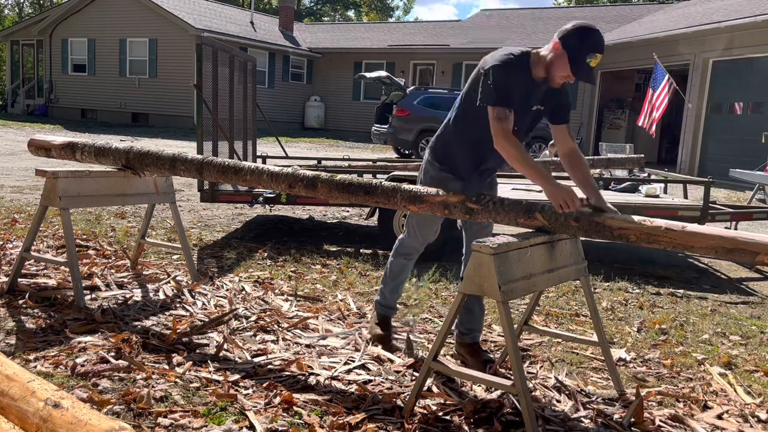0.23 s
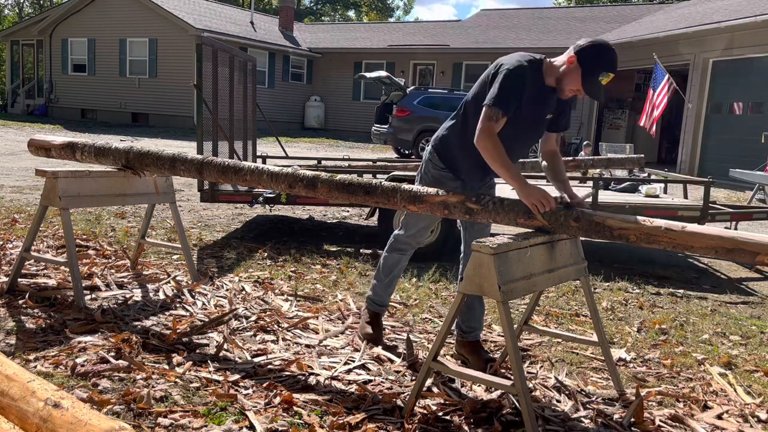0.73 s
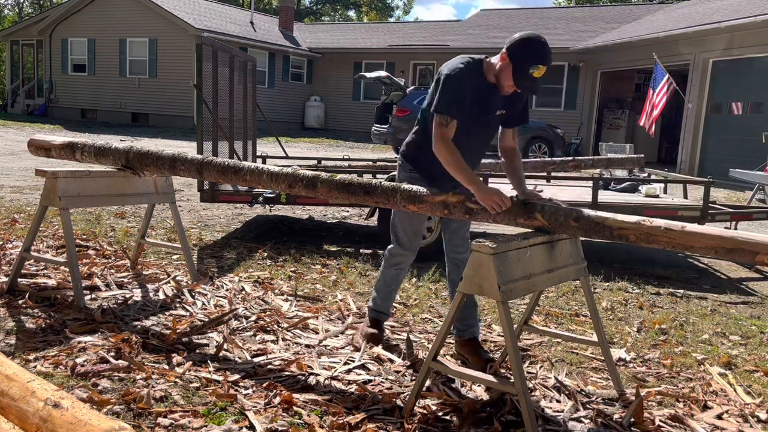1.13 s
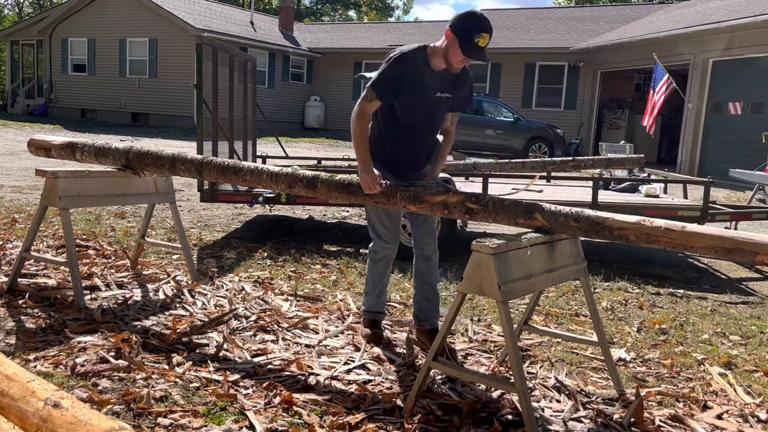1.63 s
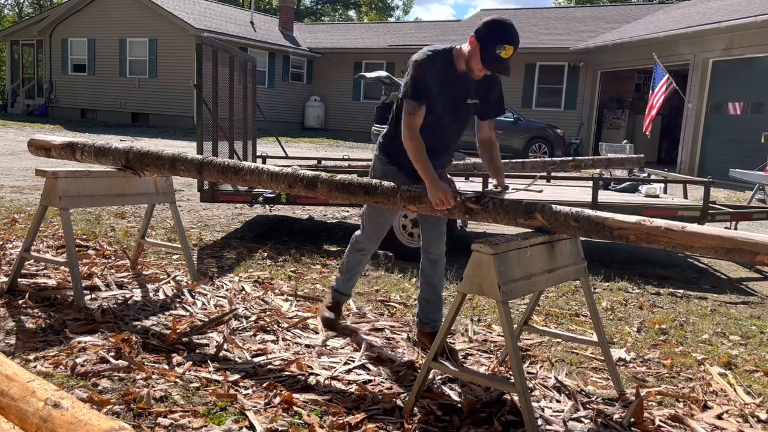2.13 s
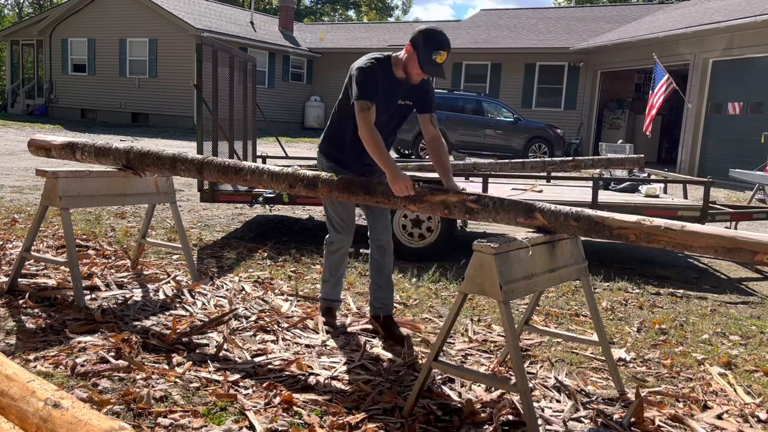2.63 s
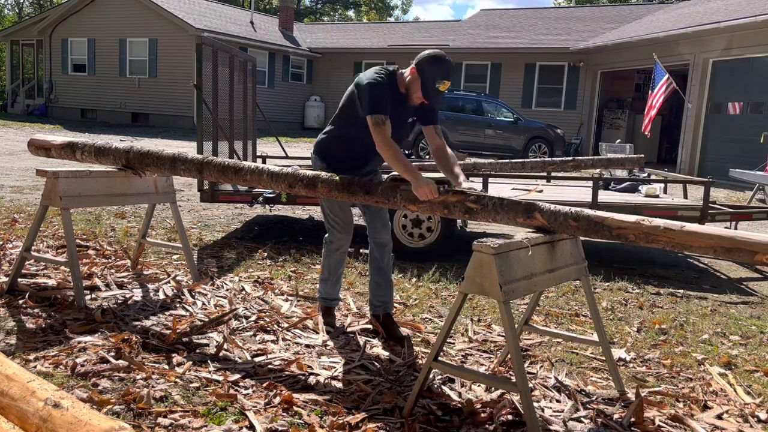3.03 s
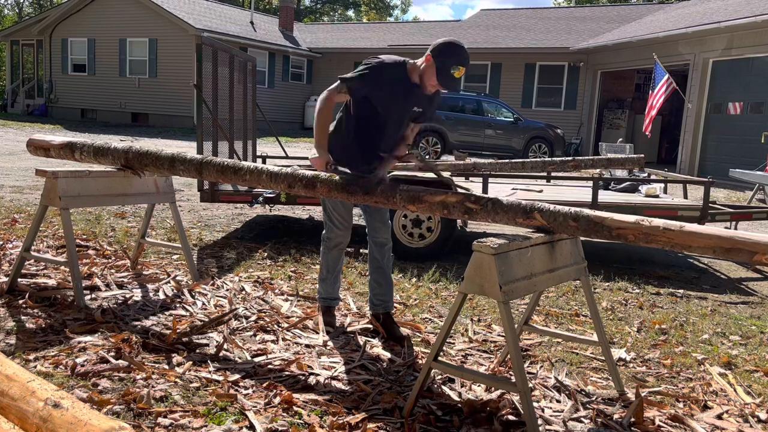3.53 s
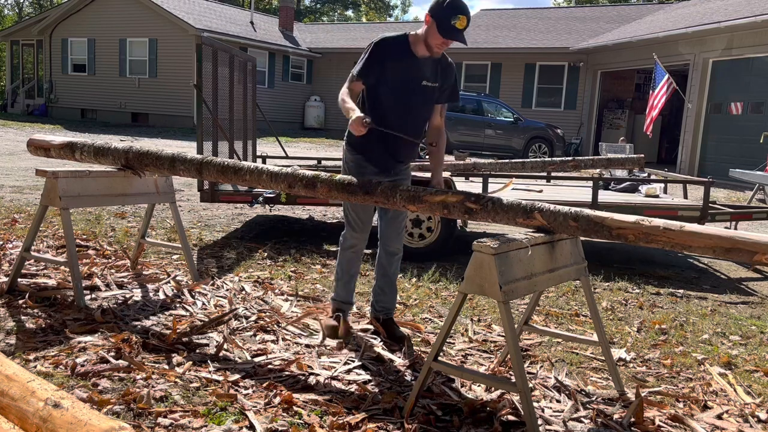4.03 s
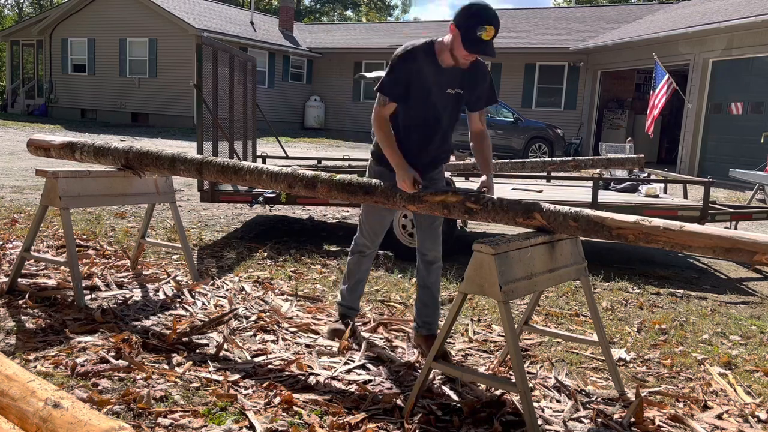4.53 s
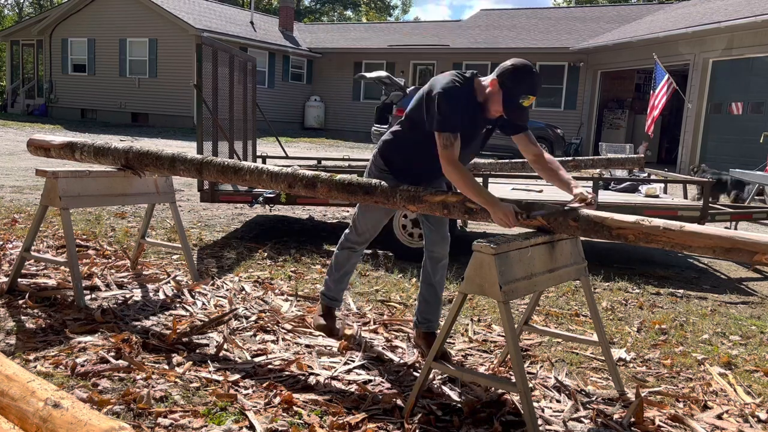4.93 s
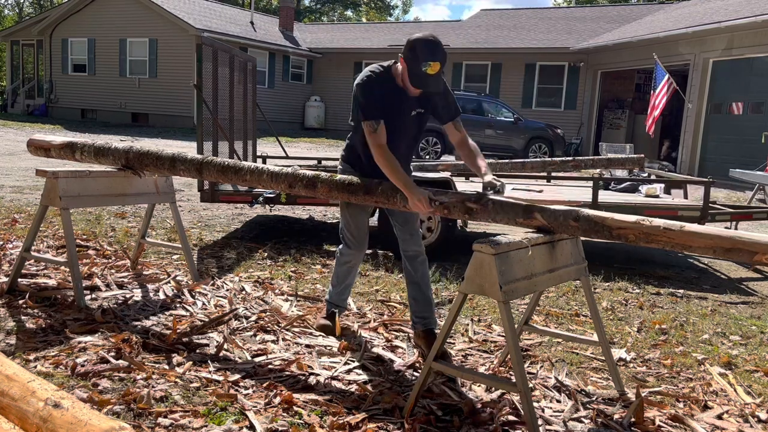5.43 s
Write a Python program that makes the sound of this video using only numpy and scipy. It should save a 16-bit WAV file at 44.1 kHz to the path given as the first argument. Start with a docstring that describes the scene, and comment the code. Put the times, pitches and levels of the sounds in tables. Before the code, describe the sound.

Steel scrapes and cracks into a log in uneven strokes, tearing off dry bark, with faint distant traffic behind.

```python
"""In a yard, a drawknife is pulled along a thin log on sawhorses, over dry rustling shavings.
The blade bites into knots: each bite cracks in the steel and rings the log's bending modes.
Bark tears off in crowds of snapping fibres; laid flat, the blade rasps, and it chinks as it grazes.
Far traffic rumble, air hiss and a faint steady hum lie under it."""
import sys
import numpy as np
from scipy import signal
from scipy.fft import rfft, irfft, next_fast_len
from scipy.io import wavfile

SR = 44100
rng = np.random.default_rng(int(sys.argv[2]) if len(sys.argv) > 2 else 0)


def wav_record(signal):
    """Record a signal, one row per channel, as 16-bit PCM in the file named by sys.argv[1]."""
    frames = np.transpose(np.atleast_2d(signal))
    bounded = np.clip(frames, -1, 1)
    # unit amplitude maps onto the largest positive 16-bit level
    quanta = np.round(bounded * 32767).astype(np.int16)
    wavfile.write(sys.argv[1], SR, quanta)


N = 250488


def from_db(db):
    """Gain of a level in dB."""
    return 10 ** (np.asarray(db) / 20)


def rms_one(x):
    """Scaled to rms 1."""
    return x / np.sqrt(np.mean(x ** 2) + 1e-20)


def at_hz(points, hz):
    """A curve of (f/Hz, value) read on a log-frequency axis."""
    return np.interp(np.log(hz), np.log(np.array(points)[:, 0]), np.array(points)[:, 1])


def nearness(hz, centre_hz, octaves):
    """Weight that falls off with the pitch distance from a centre."""
    return 1 / (1 + (np.log2(hz / centre_hz) / octaves) ** 2)


def butter(x, order, hz, kind="low"):
    """Butterworth filter."""
    return signal.sosfilt(signal.butter(order, hz, kind, fs=SR, output="sos"), x)


def drift(hz):
    """Smooth random modulation of rms 1."""
    r = np.exp(-80 * np.pi * hz / SR)
    slow = signal.lfilter([1], [1, -2 * r, r * r], rng.standard_normal(N // 40 + 2002))[2000:]
    return np.interp(np.arange(N) / 40, np.arange(len(slow)), rms_one(slow))


def grit(size, per_s, spread_db):
    """Random clicks of uneven size; rms 1."""
    sizes = from_db(spread_db * np.minimum(rng.exponential(1, size), 4)) * rng.standard_normal(size)
    return rms_one(sizes * (rng.random(size) < per_s / SR))


def resonate(x, peaks):
    """Parallel resonances of (f/Hz, width/Hz, level/dB) with alternating signs."""
    out = 0
    for k, (hz, width, db) in enumerate(peaks):
        r = np.exp(-np.pi * width / SR)
        zeros = (1 - r * r) / 2 * np.array([1, 0, -1])
        poles = [1, -2 * r * np.cos(2 * np.pi * hz / SR), r * r]
        out = out + (-1) ** k * from_db(db) * signal.lfilter(zeros, poles, x)
    return out


def friction_rings(forces, rings):
    """Each ring filters its own friction track twice, so the valleys stay deep."""
    return sum(resonate(resonate(force, [(hz, 2 * width, 0)]), [(hz, width, db)])
               for (hz, width, db), force in zip(rings, forces))


def add(track, s, sound):
    """Mix a sound into the track at s seconds."""
    at = int(round(s * SR))
    track[..., at:at + sound.shape[-1]] += sound[..., :N - at]


# Tone of the traffic and air bed: f/Hz, relative density/dB
BED_SPECTRUM = [(15, -90), (25, -92), (102, -7.5), (236, -6.5), (263, -39), (301, -10.5), (326, -3),
                (427, -12), (560, -18), (1070, -13.5), (1230, -17.5), (2050, -13), (10100, -24),
                (14000, -32), (16000, -71)]
# Its stereo image: f/Hz, left-right correlation
BED_CORRELATION = [(30, 0.8), (80, 0.98), (300, 0.94), (700, 0.67), (1300, -0.089), (2400, -0.36),
                   (4400, 0.68), (8000, 0.14), (14000, 0.19)]


def traffic_and_air(level_db=-51.5, flicker_db=0.95):
    """Far rumble and hiss: half-octave bands of stereo noise, each flickering on its own."""
    bed, edges = 0, 22 * 2 ** np.arange(0, 10, .5)
    white = rng.standard_normal((2, 2, N))
    for k, (low, high) in enumerate(zip(edges, edges[1:])):
        mid, side = butter(white[k % 2], 2, [low, high], "band")
        hz = np.sqrt(low * high)
        alike = at_hz(BED_CORRELATION, hz)
        gain = from_db(at_hz(BED_SPECTRUM, hz) + flicker_db * drift(21))
        bed = bed + gain * (np.sqrt(1 + alike) * mid + np.sqrt(1 - alike) * side * [[1], [-1]])
    bed = signal.sosfilt(signal.cheby2(10, 45, 15000, fs=SR, output="sos"), bed)   # distance dulls it
    return from_db(level_db) * rms_one(bed)


def hum(hz=296.9, level_db=-58):
    """A faint sine that wavers a little in pitch and level."""
    phase = 2 * np.pi * np.cumsum(hz + 0.814 * drift(1.28)) / SR
    return np.sqrt(2) * from_db(level_db + 0.076 * drift(1.8)) * np.sin(phase)


def shavings(ticks_per_s=150, level_db=-70):
    """Dry shavings underfoot tick in sparse, faint clumps."""
    ticks = grit(N, per_s=ticks_per_s * from_db(4.4 * drift(6.4)), spread_db=-2)
    smeared = signal.lfilter([1], [1, -.992], np.abs(ticks)) * rng.standard_normal(N)
    return from_db(level_db) * rms_one(resonate(smeared, [(1200, 2700, 8.7), (4360, 13000, 1.9)]))


# Bites and taps, levels relative within a column: t/s, crack/dB, edge over crack/dB,
# bright ring/dB, its f/Hz, thud/dB, its f/Hz, long woody ring/dB, its f/Hz
BITE_CUES = [(0.131, -28, -3, -46, 1410, -60, 327, -70, 480),
             (0.143, -34, -4, -53, 980, -55.5, 304, -71, 480),
             (0.4392, -54, -16, -35.5, 960, -37, 360, -50, 486),
             (0.6116, -38, -16, -30.5, 930, -43.5, 347, -64, 477),
             (0.6235, -30, -12, -46, 1490, -52, 340, -62, 480),
             (0.641, -50, -12, -46.5, 910, -45.5, 382, -55, 480),
             (1.1777, -37, -10, -77, 886, -83, 291, -79, 480),
             (1.537, -50, -12, -51.5, 1080, -67, 300, -65, 600),
             (2.3665, -20.5, -0.5, -28.5, 1330, -44.5, 294, -39, 556),
             (2.3684, -5.5, -14, -26.5, 1330, -32.5, 287, -32, 580),
             (2.523, -34.5, 2, -45, 1210, -60, 297, -56, 480),
             (2.589, -29.5, -18, -45, 1560, -58, 246, -60, 483),
             (2.798, -15, -3.5, -20.5, 1240, -43, 305, -56, 480),
             (2.806, -24, -3, -30, 1160, -45, 265, -36, 503),
             (2.899, -18, -21, -58, 1280, -44, 294, -60, 480),
             (2.9039, -19, -16, -44, 1330, -43, 350, -51, 480),
             (3.1394, -5, -7.5, -21.5, 1300, -49, 300, -49, 633),
             (3.142, -3.5, -11, -16, 1240, -35.5, 306, -30.5, 595),
             (3.255, -34, -14, -56, 1500, -71, 250, -61, 480),
             (3.2707, -32, -5, -49, 1000, -38, 205, -56, 480),
             (3.353, -33, -6, -61, 1290, -45.5, 242, -41, 480),
             (3.4692, -4, -22, -19.5, 1405, -38.5, 251, -32, 670),
             (3.6039, -36, -2, -55.5, 960, -51, 179, -46.5, 640),
             (4.542, -53, -10, -44.5, 930, -59, 380, -43, 563),
             (5.2048, -25, 0, -36, 1390, -64, 305, -59, 480),
             (5.5118, -22, 4, -35, 1680, -64, 350, -60, 480),
             (5.5134, -17, -2.5, -31.5, 1000, -52.5, 384, -50, 474),
             (5.561, -42, -12, -69, 1500, -70, 293, -76, 470),
             (5.582, -38, -12, -70, 1500, -66, 300, -74, 480),
             (5.6165, -45, -12, -51, 1970, -53, 300, -78, 480),
             (5.639, -25.5, -14, -34, 2120, -48, 320, -67, 600)]
# Resonances of the steel blade and of its thin cutting edge: f/Hz, width/Hz, level/dB
STEEL_RINGS = [(4140, 420, 9), (5160, 950, 1), (5900, 380, 0.5), (2520, 7300, -7.5), (11650, 2040, -8)]
EDGE_RINGS = [(8170, 4400, 3), (14600, 4300, -1)]


def bites(crack_rise_s=0.0006, swing_rise_s=0.0014, knock_t60_s=0.055):
    """The blade cracks into a knot and knocks the wood; returns sound and forces on the log."""
    crack, edge, dull = np.zeros((3, N))
    forces = np.zeros((len(LOG_MODES), N))
    t = np.arange(SR // 10) / SR
    for s, crack_db, edge_db, ring_db, ring_hz, thud_db, thud_hz, woody_db, woody_hz in BITE_CUES:
        burst = t / crack_rise_s * np.exp(1 - t / crack_rise_s) * grit(len(t), per_s=7600, spread_db=-4)
        burst[int(crack_rise_s * SR)] += 6   # the fibre gives way with one sharp snap
        burst = 8.96 * burst / np.linalg.norm(burst)
        add(crack, s, from_db(crack_db) * burst)
        add(edge, s, from_db(crack_db + edge_db) * burst)
        zone_db = [thud_db + 14, woody_db + 21, ring_db + 8]
        add(forces, s, blow_on_log(s, t, zone_db, [thud_hz, woody_hz, ring_hz]))
        envelope = from_db(ring_db + 12.5 - 60 * t / knock_t60_s) * np.minimum(t / 0.0082, 1)
        knock = envelope * rng.standard_normal(len(t))
        add(dull, s, resonate(knock, [(ring_hz, 900, 0), (thud_hz, 350, -5), (2400, 1200, -6)]))
        # the struck spot swings at once, before the log fills
        swing = t / swing_rise_s * np.exp(-t / swing_rise_s) * np.sin(2 * np.pi * ring_hz * t)
        add(dull, s, from_db(ring_db + 8) * swing)
    return resonate(crack, STEEL_RINGS) + resonate(edge, EDGE_RINGS) + dull, forces


# Where the blade strikes: t/s, share of the log's length from its nearer end
STRIKE_PLACES = [(0.13, 0.315), (0.44, 0.48), (0.62, 0.32), (2.37, 0.37), (2.8, 0.485), (2.9, 0.425),
                 (3.14, 0.13), (3.27, 0.13), (3.35, 0.49), (3.47, 0.302), (4.54, 0.27), (5.2, 0.16),
                 (5.51, 0.087), (5.64, 0.45)]


def blow_on_log(s, t, zone_db, zone_hz, mode_step_hz=195, node_leak=0.47, woody_delay_s=0.00818):
    """A push that each mode takes up by its shape at the struck place."""
    hz = np.array(LOG_MODES)[:, :1]
    order = np.arange(len(hz))[:, None] + 1
    zone = np.digitize(hz, [420, 700])   # thud, long woody ring, bright ring
    fill_s = np.choose(zone, [0.0043, 0.013, 0.0065])   # time to fill log and sawhorse
    travel_s = 0.00171 * np.sqrt(1000 / hz)   # bending waves travel slower at low pitch
    age = t - travel_s - woody_delay_s * (zone == 1)
    push = np.sin(np.pi * np.clip(age / fill_s, 0, 1)) / (fill_s * SR)
    colour = nearness(hz, np.choose(zone, zone_hz), octaves=np.choose(zone, [0.22, 0.15, 0.43]))
    place = np.interp(s, *np.transpose(STRIKE_PLACES))
    shape = 1.29 * (node_leak + np.abs(np.sin(np.pi * np.round(hz / mode_step_hz) * place)))
    gain = from_db(np.choose(zone, zone_db) + 4.4 * rng.standard_normal(hz.shape))
    swing = (-1) ** order * np.sin(2 * np.pi * hz * age)
    return gain * colour * shape * swing * push


# Bending modes of the log: f/Hz, level/dB, t60/s
LOG_MODES = [(142, -18, 0.36), (188, -7, 0.22), (259.5, -2.5, 0.17), (321, -2, 0.045), (378.7, -5.5, 0.22),
             (475.6, -14.5, 0.22), (629, -14.5, 0.094), (639, -14.5, 0.28), (823.5, -1.5, 0.1),
             (1010, -1, 0.067), (1190, -2.5, 0.057), (1400, -6, 0.071), (1578, -1.5, 0.076),
             (1810, 0, 0.065), (1988, 0.5, 0.052), (2208, 3.5, 0.025), (2460, -3, 0.04),
             (2594, -3.5, 0.062), (2900, -35, 0.055)]


def log_body(forces):
    """Every mode of the log rings from its own force track."""
    out = np.zeros(N)
    for (hz, db, t60), force in zip(LOG_MODES, forces):
        r, w = from_db(-60 / (t60 * SR)), 2 * np.pi * hz / SR
        out += from_db(db) * signal.lfilter([0, np.sin(w)], [1, -2 * r * np.cos(w), r * r], force + 1e-18)
    return out


# Bark rips and shavings crunch: peak t/s, relative level/dB, wood share/dB, swell/s, t60/s, centre f/Hz
TEAR_CUES = [(0.17, -59.5, 7.5, 0.02, 0.49, 3000), (0.368, -39, -44, 0.0054, 0.18, 2700),
             (0.402, -49, -3, 0.019, 0.42, 5600), (0.491, -45.5, -2, 0.01, 0.074, 3550),
             (0.614, -34.5, 4, 0.0051, 0.14, 3120), (0.681, -49, -1.5, 0.0097, 0.1, 3000),
             (1.56, -54, -4, 0.02, 0.5, 4000), (1.63, -51.5, 0.5, 0.0097, 0.11, 2980),
             (1.652, -50, -13, 0.007, 0.083, 2970), (2.373, -32, 3, 0.0024, 0.14, 4800),
             (2.421, -41.5, 1, 0.01, 0.24, 3880), (2.48, -41.5, -10, 0.0093, 0.16, 5950),
             (2.5, -33.5, -13.5, 0.01, 0.18, 3700), (2.519, -39, -0.5, 0.01, 0.15, 5930),
             (2.581, -38.5, -2, 0.016, 0.24, 4500), (2.807, -33.5, 4, 0.008, 0.2, 4130),
             (2.902, -26, -15.5, 0.016, 0.12, 4060), (2.93, -45.5, 3, 0.0057, 0.46, 5170),
             (2.981, -39.5, -3.5, 0.0064, 0.19, 3950), (3.149, -35, 4.5, 0.0061, 0.25, 4420),
             (3.262, -32, -5.5, 0.023, 0.24, 4260), (3.292, -41, -5, 0.01, 0.24, 5630),
             (3.352, -31.5, -1, 0.013, 0.21, 3780), (3.476, -35.5, 3.5, 0.0062, 0.26, 5000),
             (3.544, -52.5, 11, 0.015, 0.1, 3950), (3.799, -43, -13, 0.013, 0.17, 3500),
             (4.068, -49.5, -19, 0.014, 0.15, 6000), (4.378, -49.5, -6, 0.014, 0.16, 5540),
             (5.204, -28, -19, 0.0022, 0.049, 6440), (5.251, -46, -6, 0.0075, 0.073, 5050),
             (5.513, -30, -16, 0.011, 0.14, 6950), (5.553, -42, -7.5, 0.0067, 0.26, 3380),
             (5.62, -33.5, -19, 0.015, 0.39, 3650), (5.641, -40, 0, 0.0081, 0.13, 3950)]
# The blade skates under the bark before a hard bite: t/s, relative level/dB, length/s, swell/length
SKATE_CUES = [(2.312, -36.5, 0.057, 0.99), (2.761, -40, 0.046, 0.41), (3.098, -38, 0.062, 0.2),
              (3.432, -37.5, 0.04, 0.41)]
# Short rings of strips and blade, and the dull wood under the bark: f/Hz, width/Hz, level/dB
TEAR_RINGS = [(1990, 1000, 0), (3017, 160, 1), (3880, 970, 1.5), (4440, 470, -4.5), (5250, 150, -3),
              (6190, 150, -2.5), (8000, 3300, -8.5)]
WOOD_RINGS = [(333, 156, 1.5), (1200, 2630, 4), (2080, 1780, 5)]


def bark_tears(skate_wood_db=-10, skate_t60_s=0.028, skate_hz=6800):
    """Coarse and fine fibres snap in swelling, dying crowds; returns sound and force on the log."""
    forces, fine, wood = np.zeros((len(TEAR_RINGS), N)), np.zeros(N), np.zeros(N)
    t, hz = np.arange(SR // 3) / SR, np.array(TEAR_RINGS)[:, :1]
    clumps = rms_one(from_db(1.8 * drift(120)))   # fibres give way in bunches
    crowds = [(s - swell, db, wood_db, swell, 0, t60, centre_hz)
              for s, db, wood_db, swell, t60, centre_hz in TEAR_CUES]
    crowds += [(s, db, skate_wood_db, swell * length, length, skate_t60_s, skate_hz)
               for s, db, length, swell in SKATE_CUES]
    for s, db, wood_db, swell, hold, t60, centre_hz in crowds:
        at = rng.integers(N - len(t))
        attack = np.minimum(t / swell, 1) ** 1.2
        decay = from_db(-60 * np.maximum(t - max(swell, hold), 0) / t60)
        envelope = from_db(db) * attack * decay * clumps[at:at + len(t)]
        snaps = envelope * grit(len(t), per_s=6900, spread_db=-0.5)
        ring_gains = from_db(11 + 1.2 * rng.standard_normal(hz.shape))
        add(forces, s, ring_gains * nearness(hz, centre_hz, 0.86) * snaps)
        fine_db = -14.5 + 10.5 * np.log2(centre_hz / 4100)   # brighter tears hold more fine fibres
        add(fine, s, from_db(fine_db) * envelope * grit(len(t), per_s=21000, spread_db=-1))
        add(wood, s, from_db(wood_db) * envelope * grit(len(t), per_s=6800, spread_db=0))
    fizz = resonate(resonate(fine, [(10500, 21000, 1.1)]), [(8650, 3500, 2), (13500, 2100, 3.7)])
    crunch = from_db(12) * resonate(wood, WOOD_RINGS)
    return friction_rings(forces, TEAR_RINGS) + fizz + crunch, from_db(-33.5) * wood


# Flat strokes: t/s, length/s, level/dB, change over the stroke/dB, treble share/dB,
# relative rasp in the log/dB, rasp start f/Hz, rasp end f/Hz, grit centre f/Hz
SLIDE_CUES = [(0.801, 0.077, -54.5, 2, -1, -48, 825, 800, 4040),
              (1.095, 0.057, -50.5, -6, -4, -52.5, 1160, 1210, 4000),
              (1.17, 0.088, -51.5, -1.5, -3, -56, 1500, 1300, 4300),
              (1.263, 0.13, -56.5, 6, -1, -54, 1400, 1030, 4300),
              (1.393, 0.14, -52.5, -1.5, 4.5, -49, 1050, 1200, 4600),
              (4.54, 0.16, -59, -6, -12, -53.5, 745, 1120, 3000),
              (4.899, 0.13, -46, -4, -11, -49.5, 2190, 1600, 4800),
              (5.018, 0.2, -53.5, -1.5, -2.5, -51, 900, 1100, 4000)]
# Rings of the blade lying flat: f/Hz, width/Hz, level/dB
FLAT_BLADE_RINGS = [(1870, 540, 0), (2870, 140, 3.5), (3880, 780, 1.5), (4460, 230, 4.5), (5800, 430, 0),
                    (8350, 490, -10), (10000, 1300, -14), (12600, 1900, -11)]


def blade_slides(attack_s=0.013, release_s=0.011, ring_hz=3900, tilt_octaves=0.038, tilt_db_per_s=5):
    """Friction grit rings the blade and rasps in the wood; returns sound and forces on the log."""
    blade_hz, log_hz = np.array(FLAT_BLADE_RINGS)[:, :1], np.array(LOG_MODES)[:, :1]
    flicker = from_db([3 * drift(20) for _ in FLAT_BLADE_RINGS])
    friction = flicker * grit(N, per_s=3000, spread_db=-4)
    friction /= np.std(friction_rings(friction, FLAT_BLADE_RINGS))
    fine = grit(N, per_s=9100, spread_db=3)
    hiss = rms_one(resonate(fine, [(7950, 51000, 0.43), (11850, 13000, 1.9)]))
    flutter = from_db(1) * rms_one(butter(grit(N, per_s=2200, spread_db=-5), 2, 180))
    rub = grit(N, per_s=4400, spread_db=-9)
    out, pressure, forces = np.zeros(N), np.zeros(flicker.shape), np.zeros((len(LOG_MODES), N))
    for s, length, db, change_db, treble_db, rasp_db, start_hz, end_hz, centre_hz in SLIDE_CUES:
        at = np.arange(round(s * SR), round((s + length + release_s) * SR))
        t = at / SR - s
        progress = t / length
        touch = from_db(-7.5 * (np.maximum(1 - t / attack_s, 0) + np.maximum(t - length, 0) / release_s))
        level = touch * from_db(db + change_db * progress)
        # the blade tips up along the stroke: its ring rises and the hiss brightens
        pitch_hz = ring_hz * 2 ** (tilt_octaves * progress ** 2)
        ring = flutter[at] * np.sin(2 * np.pi * np.cumsum(pitch_hz) / SR)
        bright = from_db(treble_db + tilt_db_per_s * t)
        out[at] += level * (ring + bright * touch * hiss[at])
        pressure[:, at] += level * nearness(blade_hz, centre_hz, 2.5)
        rasp_hz = start_hz * (end_hz / start_hz) ** progress
        forces[:, at] += touch * from_db(rasp_db - 29) * nearness(log_hz, rasp_hz, 0.63) * rub[at]
    return out + friction_rings(pressure * friction, FLAT_BLADE_RINGS), forces


# The blade grazes the wood: t/s, relative level/dB, length/s
CHINK_CUES = [(1.645, -51.5, 0.013), (5.347, -51.5, 0.035), (5.449, -51.5, 0.021)]
# The rings this wakes: f/Hz, width/Hz, level/dB
CHINK_RINGS = [(3025, 130, 2.5), (3920, 93, -2), (4460, 98, -1.5), (5840, 99, -5), (4300, 2000, -13.5)]


def blade_chinks():
    """Short gritty touches ring a few narrow modes of the blade."""
    touches = np.zeros(N)
    for s, db, length in CHINK_CUES:
        size = int(length * SR)
        envelope = from_db(db + 21) * signal.windows.tukey(size, .12)
        add(touches, s, envelope * grit(size, per_s=4000, spread_db=4))
    return friction_rings([touches] * len(CHINK_RINGS), CHINK_RINGS)


# Phase between two microphone ports: f/Hz, left lead/rad
LEFT_LEAD = [(300, 0.1), (600, 0.42), (1000, 0.47), (2400, 1.04), (4400, 0.12), (8000, 0.84), (12000, 1.5)]
# Slaps off ground, trailer and walls: delay t/s, left level/dB, right level/dB
SLAPS = [(.009, -52, -52), (0.015, -16.5, -16.5), (0.03, -20.5, -40), (.052, -53, -41)]


def yard_space(x, scatter_db=-15.5, scatter_t60_s=0.039):
    """Two ports hear the work out of phase; shavings and sawhorses scatter treble; dull echoes follow."""
    size = next_fast_len(N + 4096)
    lead = at_hz(LEFT_LEAD, np.fft.rfftfreq(size, 1 / SR) + 1)
    out = irfft(rfft(x, size) * np.exp(.5j * lead * [[1], [-1]]), size)[:, :N]
    t = np.arange(SR // 20) / SR
    scatter = rng.standard_normal((2, len(t))) * from_db(-60 * t / scatter_t60_s)
    scatter *= from_db(scatter_db) / np.linalg.norm(scatter, axis=1, keepdims=True)
    out += signal.fftconvolve(butter(x, 2, 1500, "high")[None], scatter, axes=1)[:, :N]
    dull = butter(x, 1, 6000)
    for s, left_db, right_db in SLAPS:
        add(out, s, from_db([[left_db], [right_db]]) * dull)
    return out


# Pan of the blade as it works along the log: t/s, left minus right/dB
WORK_PAN = [(0.13, 1), (0.45, -0.5), (0.65, -0.5), (1.5, 0.3), (2.37, 0), (2.8, 0), (3.3, 0.5), (3.5, 0),
            (4.55, 1.5), (5.2, 0), (5.5, 0), (5.65, 0)]


def scene():
    """Knife, log and shavings, panned over the bed of traffic, air and hum."""
    cracks, blows = bites()
    rips, tearing = bark_tears()
    scrapes, rubbing = blade_slides()
    work = cracks + rips + scrapes + blade_chinks() + shavings() + log_body(blows + tearing + rubbing)
    work = butter(work, 3, 125, "high")   # thin wood radiates no deep bass
    pan_db = np.interp(np.arange(N) / SR, *np.transpose(WORK_PAN))
    return yard_space(work) * from_db(pan_db / 2 * [[1], [-1]]) + traffic_and_air() + hum()


# Notch of the microphone housing: f/Hz, width/Hz, depth (0-1)
HOUSING_DIPS = [(3460, 4350, 0.5)]


def record(dry, cutoff_hz=16700):
    """The microphone housing dips one band; the extreme top is cut."""
    for hz, width, depth in HOUSING_DIPS:
        dry = dry - depth * resonate(dry, [(hz, width, 0)])
    soft = butter(dry, 4, 15500)
    return signal.sosfilt(signal.cheby2(12, 70, cutoff_hz, fs=SR, output="sos"), soft)


dry = scene()
out = record(dry)
wav_record(out)
```